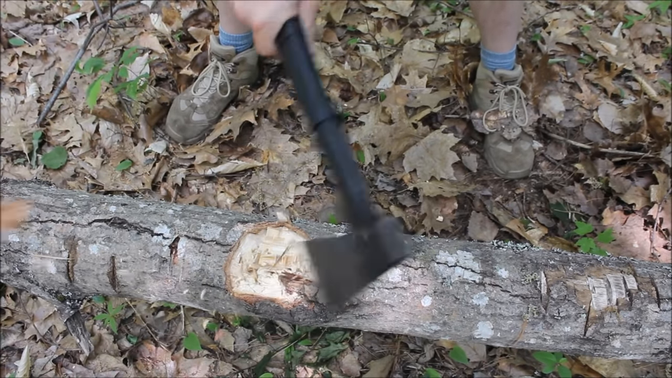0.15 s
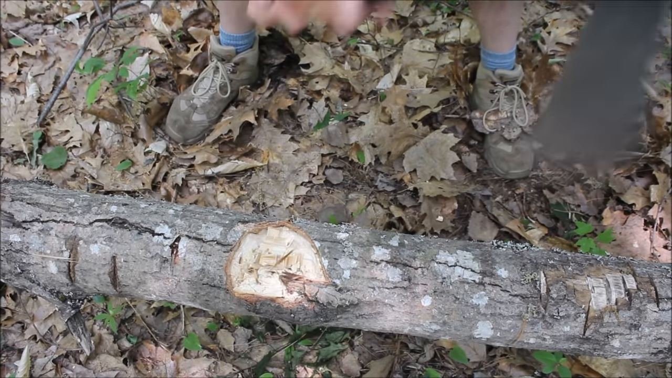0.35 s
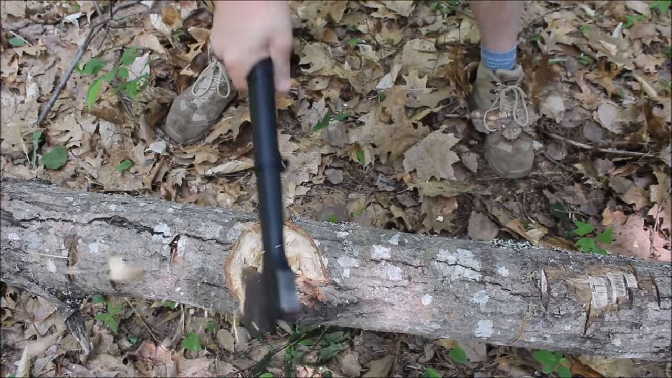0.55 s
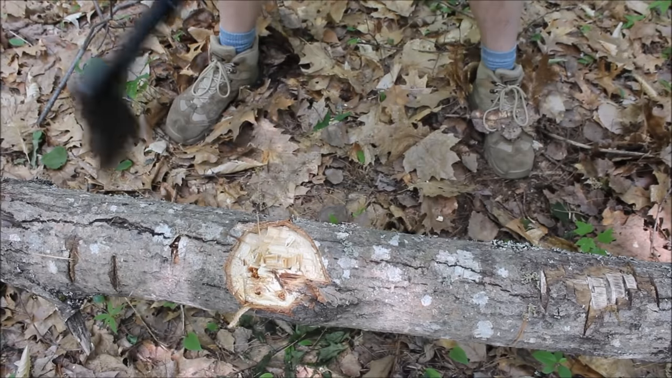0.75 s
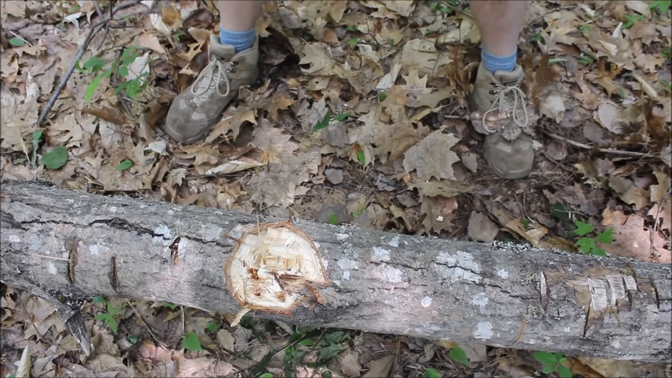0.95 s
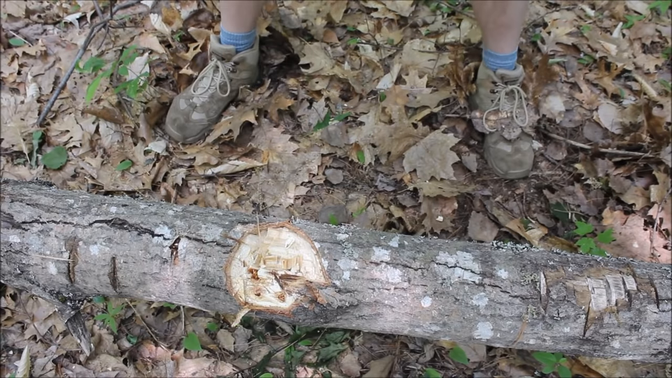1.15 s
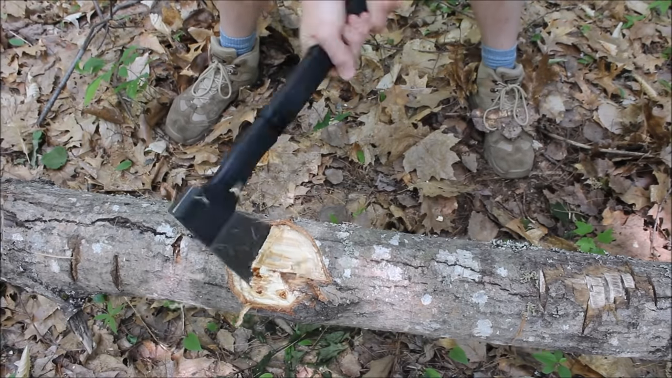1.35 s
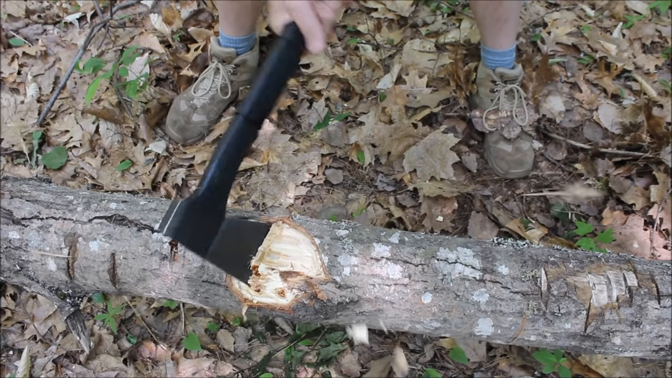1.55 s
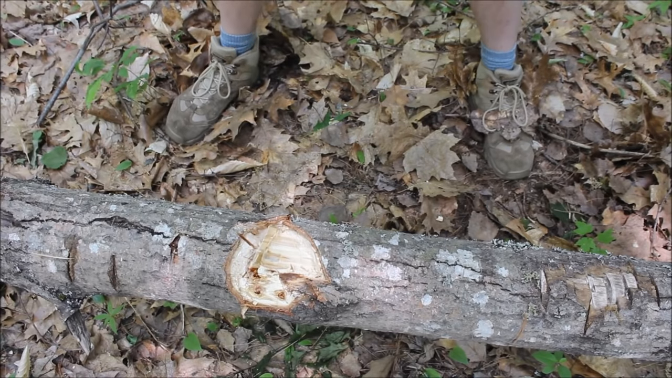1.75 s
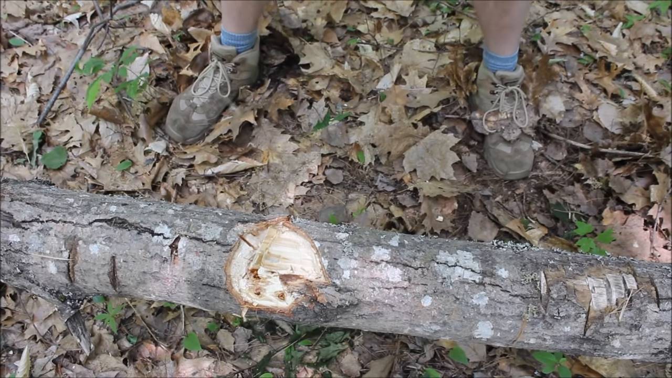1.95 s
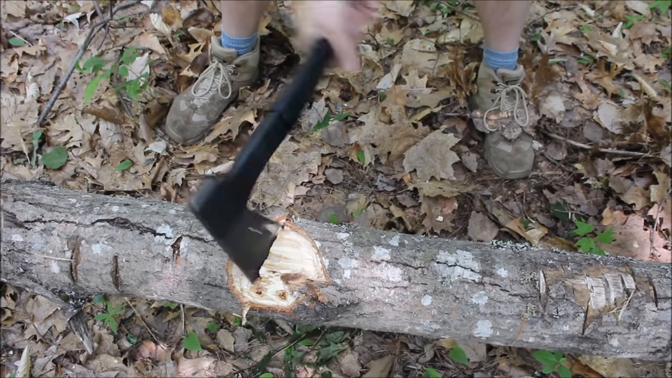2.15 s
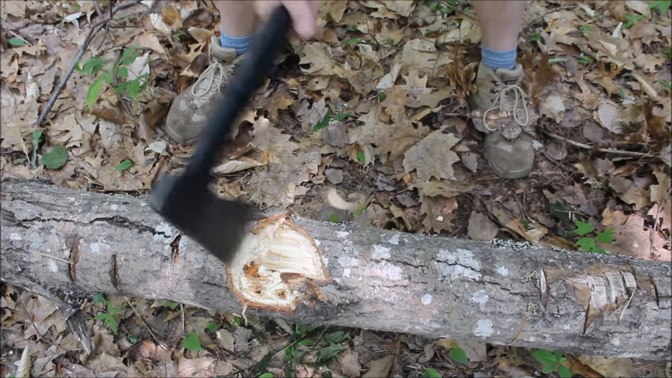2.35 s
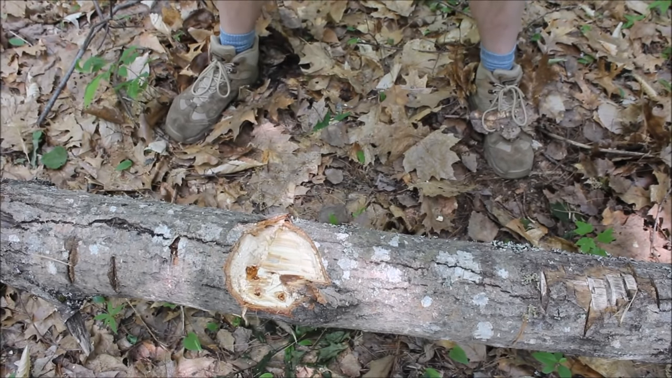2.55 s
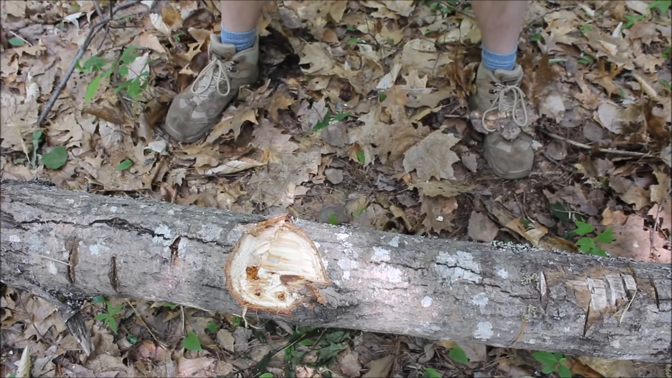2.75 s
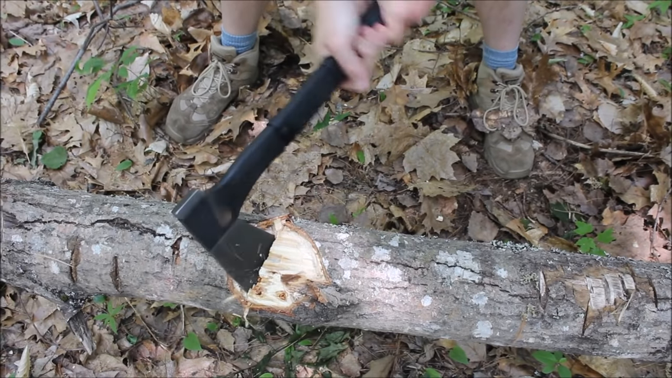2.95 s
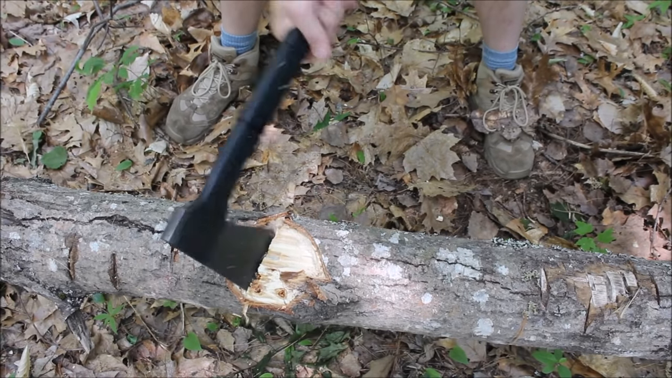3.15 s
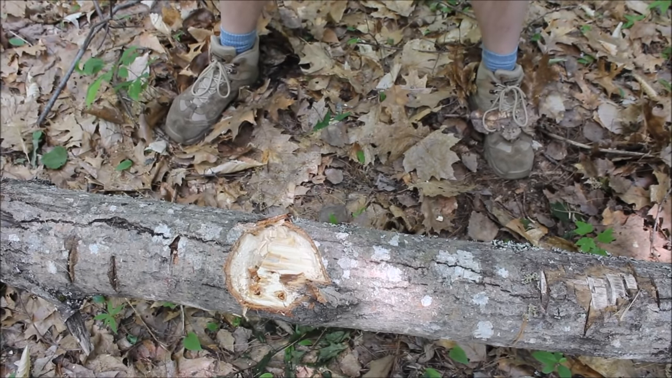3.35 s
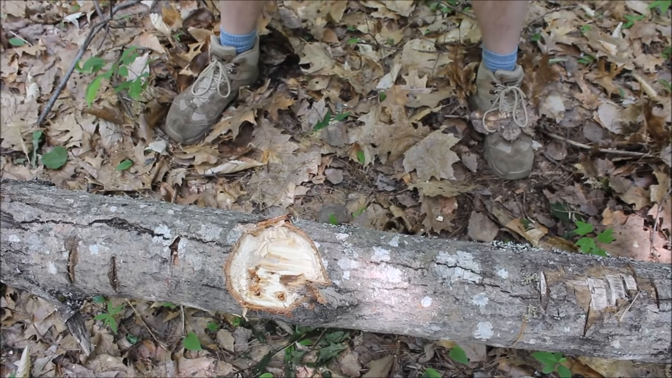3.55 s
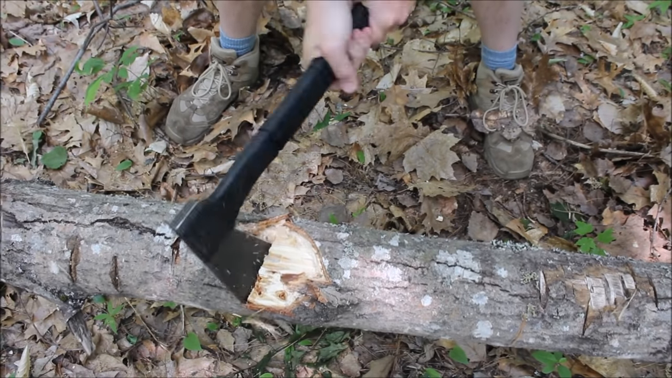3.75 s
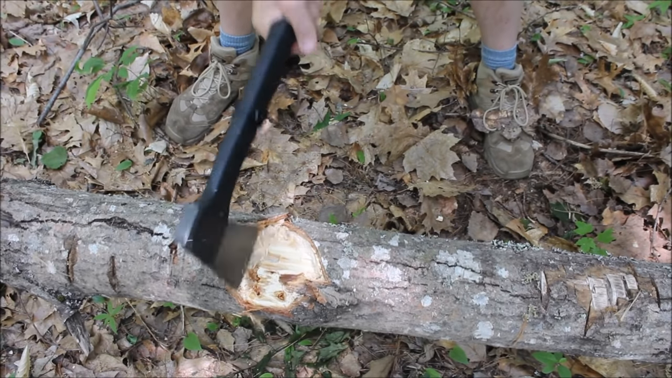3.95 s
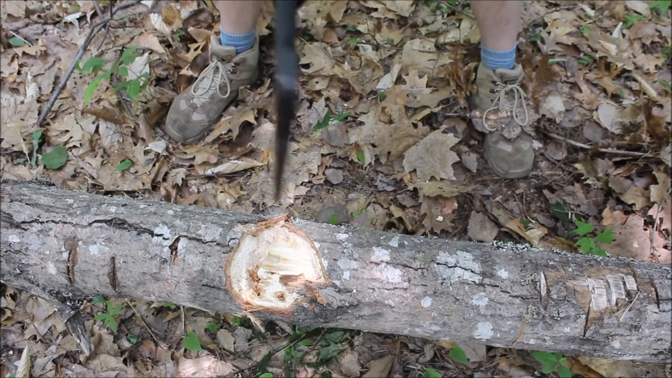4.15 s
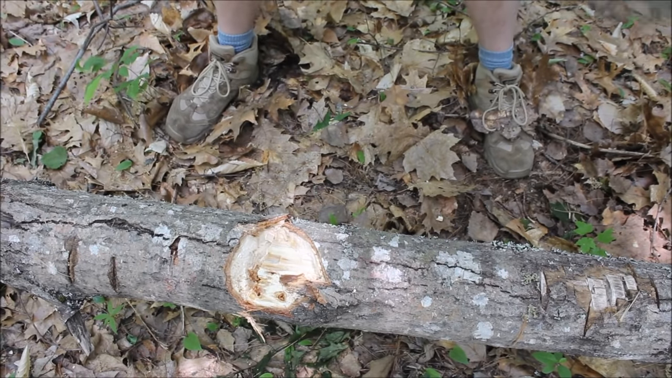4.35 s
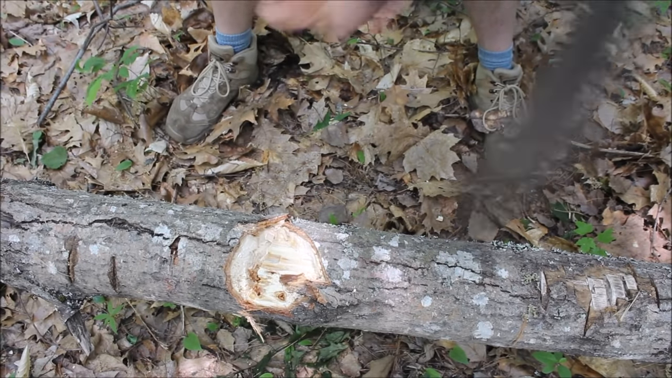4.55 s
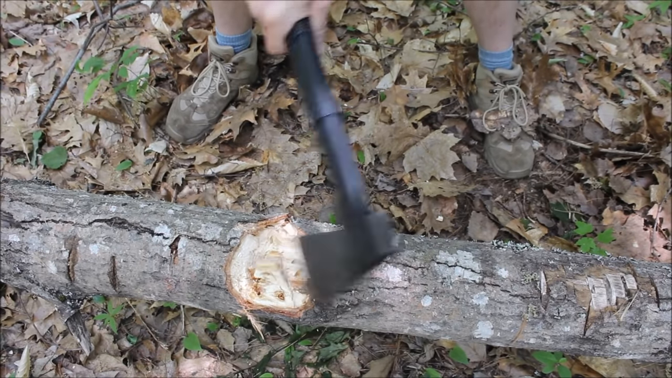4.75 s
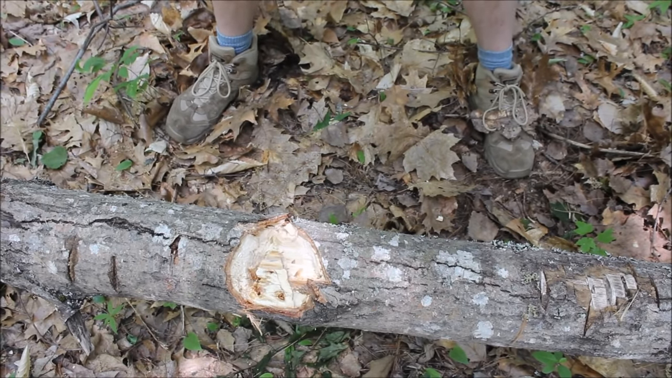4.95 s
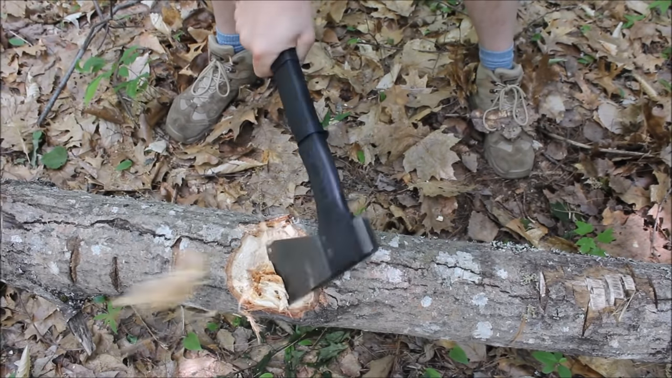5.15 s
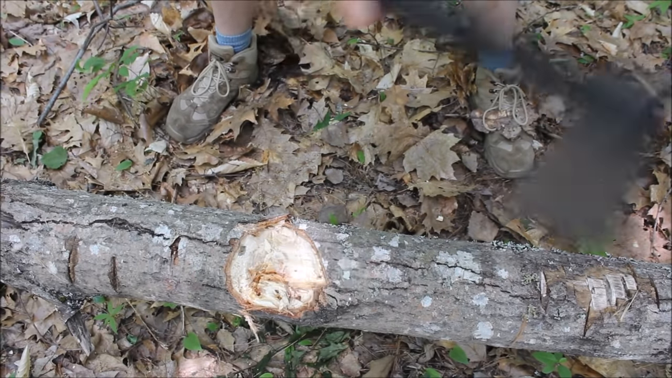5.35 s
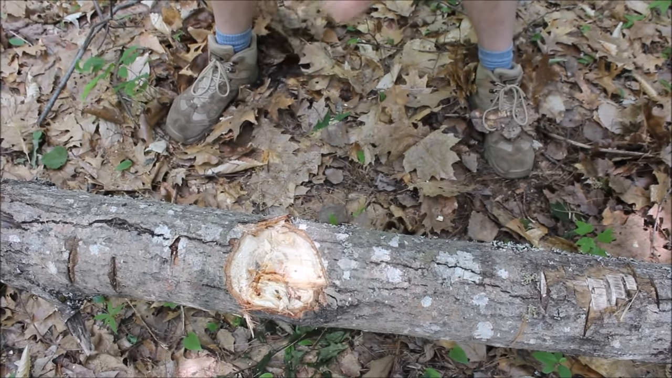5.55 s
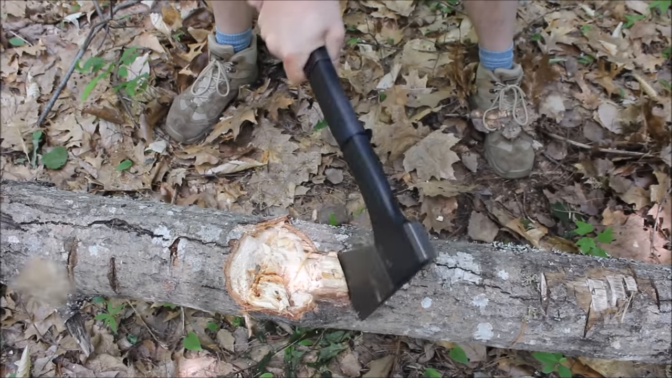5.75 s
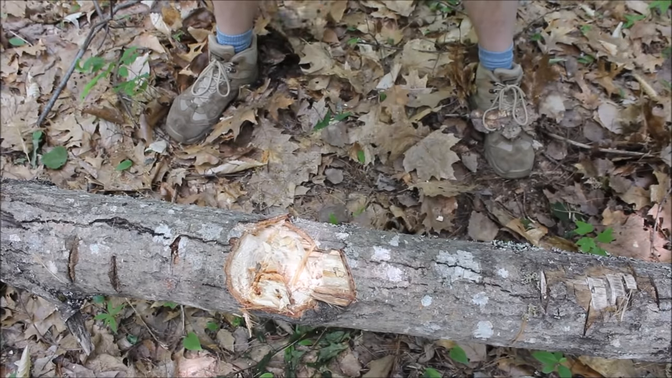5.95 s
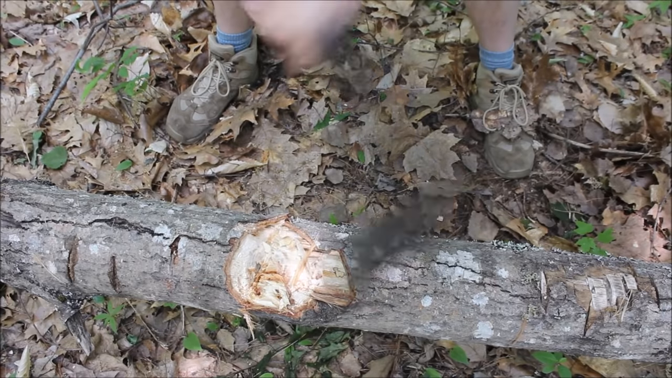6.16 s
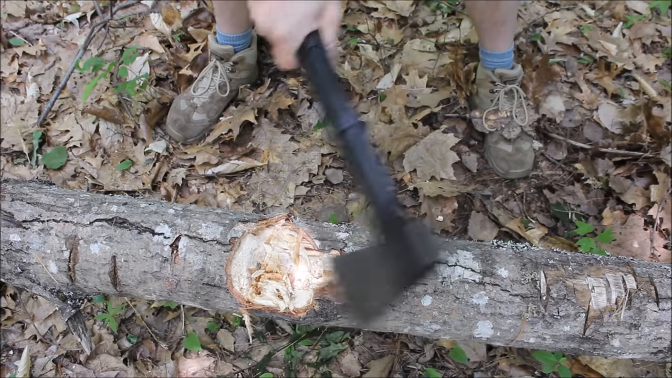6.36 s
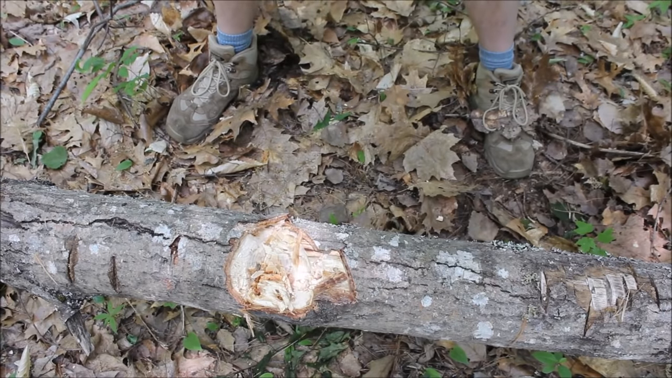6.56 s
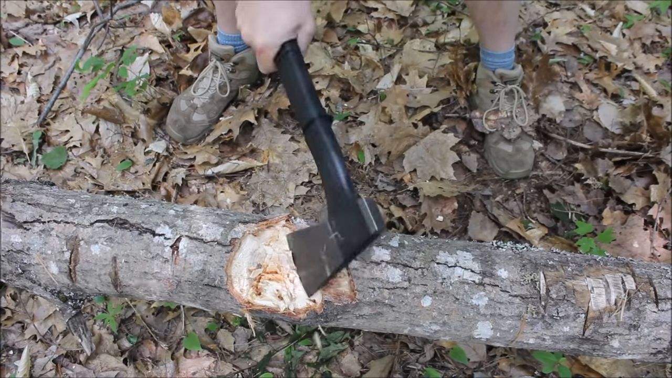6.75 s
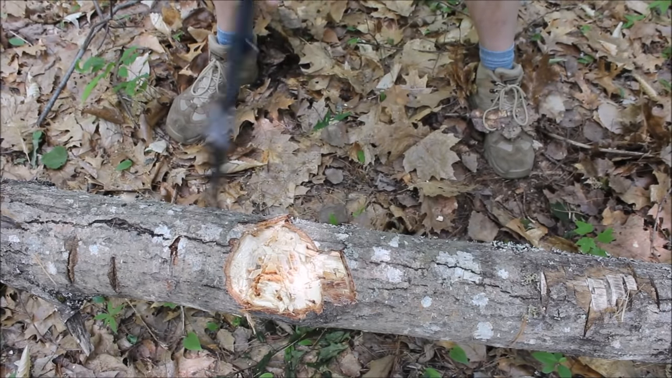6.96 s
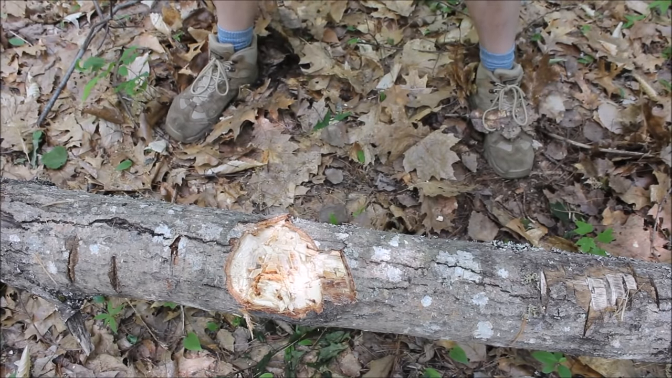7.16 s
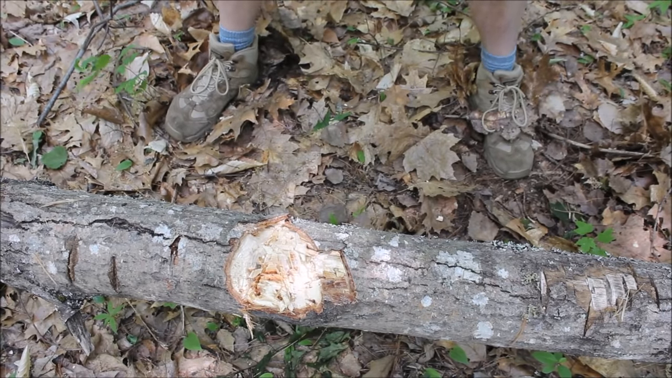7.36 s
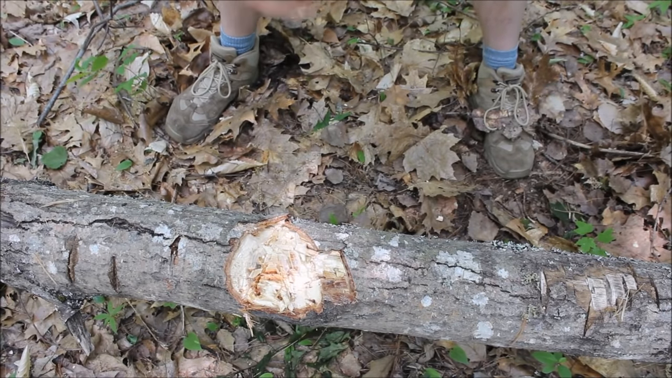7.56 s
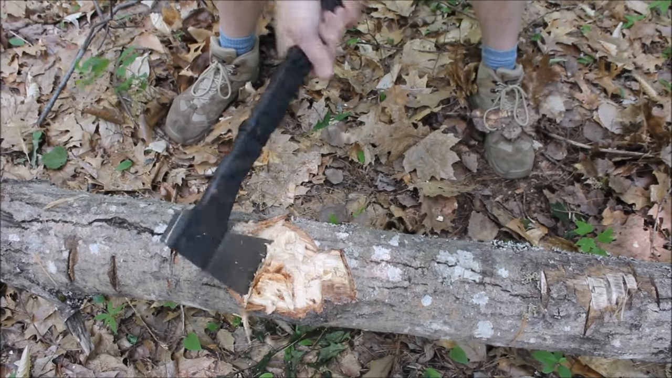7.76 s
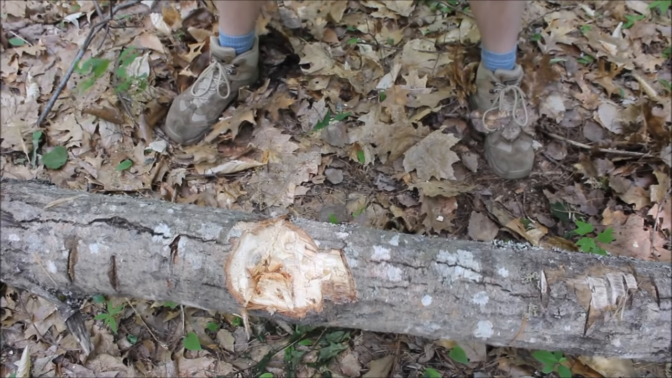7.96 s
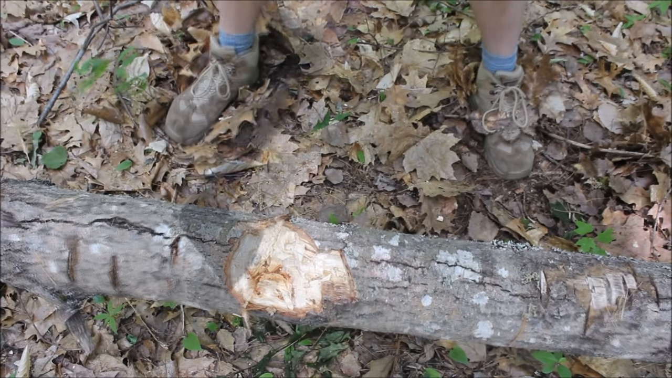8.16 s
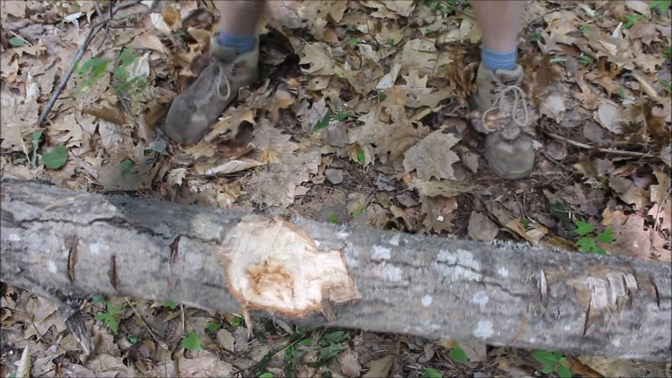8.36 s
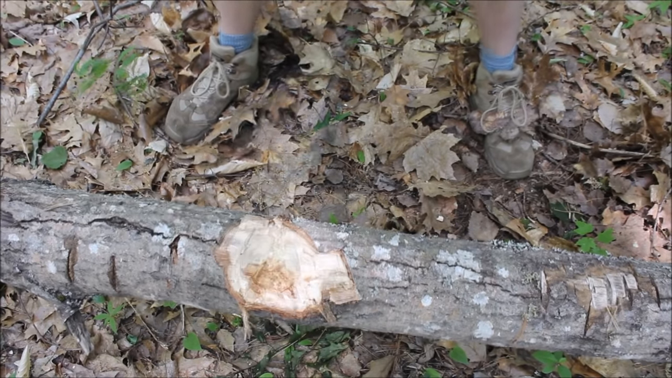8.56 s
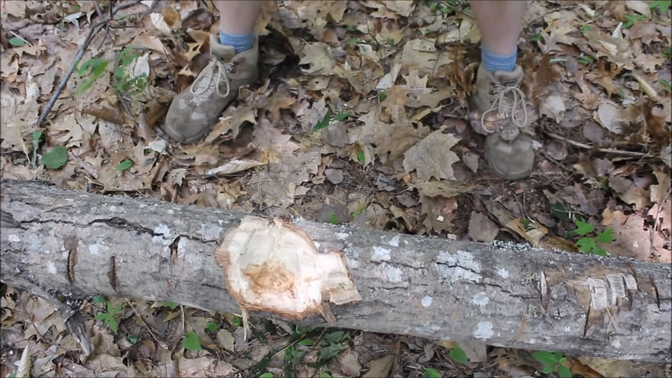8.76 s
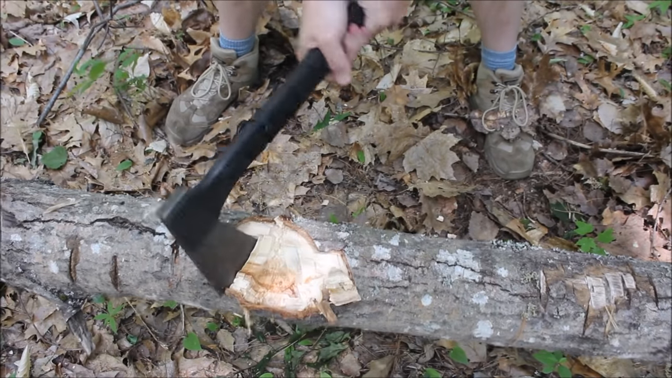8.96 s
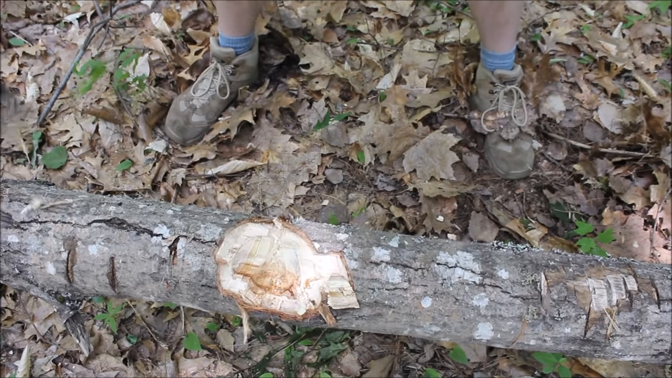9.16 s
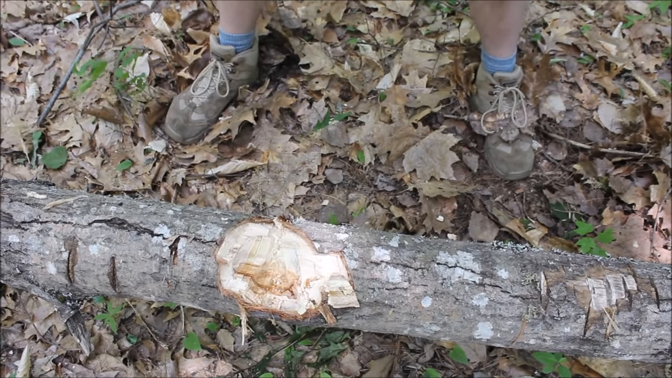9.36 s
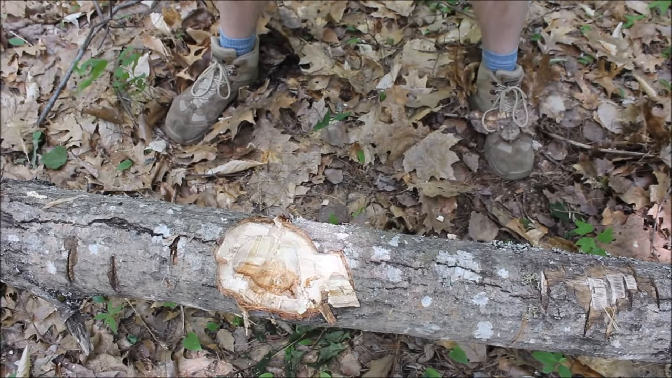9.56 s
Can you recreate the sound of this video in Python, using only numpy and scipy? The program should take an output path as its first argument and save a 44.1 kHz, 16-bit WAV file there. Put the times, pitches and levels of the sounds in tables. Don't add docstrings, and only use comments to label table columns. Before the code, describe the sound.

Close to the microphone, an axe strikes a lying log fifteen times over about ten seconds. Every hit is a sharp, clipped crack with a brief squealing bite, tearing fibres and a short woody thud. Chips snap loose and tumble through dry leaves, most clearly after the second blow. Leaves crackle between hits, over quiet woodland air, faint trunk echoes and low ground rumble.

```python
import sys
import numpy as np
from scipy import signal
from scipy.fft import rfft, irfft
from scipy.io import wavfile
from scipy.ndimage import uniform_filter1d

SR = 44100
rng = np.random.default_rng(int(sys.argv[2]) if len(sys.argv) > 2 else 0)


def voltage_ratio(level):
    return 10 ** (np.asarray(level, float) / 20)


def transcribe(signal):
    frames = np.atleast_2d(signal).T
    limited = np.clip(frames, -1, 1)
    pcm = np.round(limited * 32767).astype(np.int16)
    wavfile.write(sys.argv[1], SR, pcm)


N = 423801


def evened(x):
    return x / np.sqrt(np.mean(x ** 2) + 1e-20)


def read(points, hz):
    f, value = np.transpose(points)
    return np.interp(np.log(hz + 1), np.log(f + 1), value)


def add(mix, s, sound):
    part = mix[max(round(s * SR), 0):][:len(sound)]
    part += sound[:len(part)]


def resonate(x, hz, width):
    turn = np.exp(2j * np.pi * np.cumsum(hz * np.ones(len(x))) / SR)
    r = np.exp(-np.pi * width / SR)
    return 2 * (turn * signal.lfilter([1 - r], [1, -r], x / turn)).real


def resonate_twice(x, hz, width, second_width):
    return resonate(resonate(x, hz, width), hz, second_width)


def filtered(x, order, hz, kind="low"):
    return signal.lfilter(*signal.butter(order, hz, kind, fs=SR), x)


def colour(x, points):
    gain = voltage_ratio(read(points, np.fft.rfftfreq(len(x), 1 / SR)))
    return evened(irfft(rfft(x) * gain, len(x)))


def fade(t, t60, rise):
    return (1 - np.exp(-t / rise)) * voltage_ratio(-60 * t / max(t60, .002))


# (frequency [Hz], density [dB per Hz])
HUSH_SPECTRUM = [(18, -16), (30, -9), (71, 0), (184, -24), (437, 13), (3140, 9), (16000, -62)]


def hush():
    return voltage_ratio(-68) * colour(rng.standard_normal(N), HUSH_SPECTRUM)


# (frequency [Hz], t60 [s])
TRUNK_ECHO = [(60, 0.43), (160, 0.16), (420, 0.14), (1100, 0.18), (2900, 0.68), (7700, 0.29),
              (16000, 0.072)]


def woods(x):
    taps = np.zeros(SR)
    at = np.arange(500, SR - 20, 20)
    taps[at + rng.integers(0, 20, len(at))] = rng.choice([-1., 1.], len(at))
    hz, t, z = signal.stft(taps, SR, nperseg=256)
    dying = voltage_ratio(-60 * t / read(TRUNK_ECHO, hz)[:, None])
    tail = signal.istft(z * dying, SR, nperseg=256)[1]
    x = filtered(x, 1, 1100)
    return signal.fftconvolve(x, tail / np.linalg.norm(tail))[:N]


# (time [s], level [dB])
STIRRING = [(0.0, -46.5), (0.16, -56.5), (0.77, -56), (1.15, -44), (1.63, -56.5), (2.22, -46), (2.57, -54),
            (2.97, -46), (3.26, -55), (4.63, -48.5), (4.82, -55.5), (5.62, -61.5), (6.1, -47), (7.07, -55),
            (7.33, -46.5), (8.88, -43.5), (9.21, -51), (9.61, -44)]


def stir_db(t):
    sweep_db, rise_s, fall_s = -49, 0.18, 0.043
    power = voltage_ratio(np.interp(t, *np.transpose(STIRRING)) + 2.5) ** 2
    for row in AXE_BLOWS:
        pace_s = np.where(t < row[0], rise_s, fall_s)
        power = power + voltage_ratio(sweep_db) ** 2 * np.exp(-abs(t - row[0]) / pace_s)
    return 10 * np.log10(power)


def stir_curve_db():
    return np.repeat(stir_db(np.arange(0, N, 64) / SR), 64)[:N]


# (time [s], level [dB], pitch [Hz])
SOIL_THUMPS = [
    (.998, -44, 100),
    (1.028, -51, 90),
    (1.076, -37, 80),
    (1.11, -42, 101),
    (1.143, -42, 70),
    (1.189, -32, 113),
    (1.222, -38, 130),
    (1.292, -47, 80),
    (1.33, -50, 70),
]


def rumble():
    rest_db, stir_share = -66.5, 0.61
    blow_db, blow_t60_s, blow_rise_s = -44.5, 1.07, 0.038
    thump_shake_db, thump_t60_s, thump_rise_s = -8, 0.11, 0.005
    t = np.arange(N) / SR
    noise = rng.standard_normal((2, N))
    low = evened(resonate(resonate(noise[0], 54, 26), 60, 64))
    shake = voltage_ratio(rest_db + stir_share * (np.interp(t, *np.transpose(STIRRING)) + 51))
    for row in AXE_BLOWS:
        add(shake, row[0], voltage_ratio(blow_db + row[4]) * fade(t[:SR], blow_t60_s, blow_rise_s))
    thumps = np.zeros(N)
    short = t[:SR // 4]
    for s, db, hz in SOIL_THUMPS:
        knock = voltage_ratio(db) * fade(short, thump_t60_s, thump_rise_s)
        add(shake, s, voltage_ratio(thump_shake_db) * knock)
        grit = evened(resonate_twice(noise[1, round(s * SR):][:SR // 4], hz, 130, 170))
        add(thumps, s, knock * (np.sin(2 * np.pi * hz * short) + 0.25 * grit))
    return shake * low + thumps


def pricks():
    per_s, level_db, t60_s = 45, -4.5, 0.0036
    size = voltage_ratio(4.0 * np.minimum(rng.exponential(1, N), 4)) * (rng.random(N) < per_s / SR)
    spread = signal.oaconvolve(size, voltage_ratio(-60 * np.arange(800) / SR / t60_s))[:N]
    thin = filtered(spread * rng.standard_normal(N), 2, 3000, "high")
    return voltage_ratio(level_db + stir_curve_db()) * thin


# (frequency [Hz], density [dB per Hz])
LEAF_SPECTRUM = [(59, 5), (100, 16.5), (302, 0), (547, 0), (1010, -1), (1720, -2.5), (3050, -1.5),
                 (7140, -6.5), (16000, -20)]


def rustle():
    bright_db, brighter_per_db = -2.5, 0.06
    level_db = stir_curve_db()
    clumps = voltage_ratio(5 * evened(uniform_filter1d(rng.standard_normal(N), size=500)))
    crackles = rng.random(N) < 700 * clumps / SR
    size = voltage_ratio(2.95 * np.minimum(rng.exponential(1, N), 5)) * crackles
    spread = signal.oaconvolve(size, voltage_ratio(-60 * np.arange(400) / SR / 0.0021))[:N]
    noise = rng.standard_normal((2, N))
    leaves = colour(evened(spread * noise[0]) * 0.73 + noise[1], LEAF_SPECTRUM)
    leaves = filtered(leaves, 2, 330, "high")
    dull = filtered(leaves, 2, 3500)
    treble_gain = voltage_ratio(bright_db + brighter_per_db * (level_db + 54.5))
    return voltage_ratio(level_db) * (dull + treble_gain * (leaves - dull))


# (time [s], level [dB rms], pitch [Hz], length [s])
LEAF_SCUFFS = [(0.891, -45.5, 3500, 0.044), (0.916, -41, 3560, 0.053), (0.985, -37, 4030, 0.093),
               (1.075, -40, 1970, 0.052), (1.105, -25.5, 2950, 0.029), (1.203, -30.5, 3060, 0.042),
               (1.309, -43, 2460, 0.11), (2.962, -31.5, 2770, 0.041), (4.393, -43.5, 2510, 0.053),
               (6.036, -30.5, 3000, 0.051), (7.325, -38, 1500, 0.067), (8.634, -41, 3100, 0.11)]


def scuff(row, chance):
    s, level_db, hz, length = row
    u = np.arange(len(chance)) / SR / length
    uneven = voltage_ratio(3.2 * evened(uniform_filter1d(chance[::-1], size=90)))
    body = evened(resonate(chance, hz, 2.6 * hz)) + 0.3 * colour(chance, LEAF_SPECTRUM)
    body = filtered(body, 2, 300, "high")
    swell = np.sin(np.pi * np.minimum(u, 1) ** 0.28)
    return voltage_ratio(level_db) * evened(body * uneven) * swell


# (time [s], peak level [dB], pitch [Hz], treble [dB])
CHIP_TUMBLE = [(0.761, -22, 3330, -38), (0.78, -23.5, 3940, -16), (0.815, -34, 3330, -3),
               (0.902, -24.5, 3770, -14), (0.933, -19.5, 3500, 7), (0.956, -32, 3400, -9),
               (0.983, -19, 5300, -22), (0.998, -20.5, 5110, -17), (1.06, -28, 1400, -28),
               (1.077, -17.5, 2210, -24), (1.108, -9, 5650, -8), (1.14, -22.5, 3750, 7),
               (1.184, -24, 2290, -20), (1.205, -26, 3940, -18), (1.276, -29, 5910, -25),
               (1.291, -13.5, 4630, -3), (1.317, -24.5, 1600, -14), (1.347, -23.5, 1440, -16)]
# (time [s], peak level [dB], pitch [Hz], treble [dB])
CHIP_SNAPS = [(0.059, -26, 870, -18.5), (0.451, -33, 2990, 16), (1.838, -23.5, 2360, -12),
              (2.029, -25.5, 2240, -10), (2.124, -27, 844, -21), (2.714, -26.5, 1940, -12),
              (2.774, -27, 3000, 1), (2.857, -29, 1960, -16), (3.289, -29, 1320, -12),
              (3.726, -30.5, 1130, -15), (3.922, -33.5, 1760, -23), (4.097, -26, 4630, -6),
              (4.348, -26, 4360, 3), (4.382, -16.5, 2850, -7), (5.913, -26.5, 1940, -9),
              (6.185, -22.5, 2270, -9), (6.528, -32.5, 3190, -5), (6.709, -28.5, 765, -18),
              (7.081, -25.5, 2690, -6), (7.174, -27.5, 2680, 11), (7.216, -25, 4270, -34),
              (7.325, -22.5, 5290, 3), (7.386, -25.5, 3140, 9), (7.436, -26.5, 6100, -30),
              (7.47, -33, 5050, -34), (8.111, -23, 1890, -13), (8.161, -22.5, 4060, -11),
              (8.435, -26.5, 2040, 0), (8.643, -22, 2540, 6), (9.427, -27, 2880, -11)]
# (time [s], peak level [dB], pitch [Hz], treble [dB])
BARK_TICKS = [
    (6.233, -16, 2500, -1),
    (6.756, -37, 4900, -7),
    (7.65, -20.5, 1500, -11),
    (7.6617, -25, 3500, -18),
    (8.214, -22.5, 3320, -14),
    (8.969, -25.5, 1500, -11),
]
# (time [s], peak level [dB], pitch [Hz])
MORE_SNAPS = [(0.307, -32, 3400), (0.394, -30.5, 5470), (0.589, -34, 2050), (0.657, -37, 1600),
              (1.658, -30, 2050), (2.064, -27.5, 1490), (2.507, -29.5, 4100), (2.882, -26.5, 4180),
              (3.554, -29.5, 5940), (5.059, -28, 3150), (5.119, -29.5, 3760), (5.608, -29.5, 1410),
              (5.625, -30, 1920), (5.666, -30.5, 2380), (6.006, -23.5, 5000), (6.472, -36.5, 2500),
              (6.652, -29.5, 2650), (6.978, -35.5, 2100), (7.145, -32.5, 2270), (7.506, -30, 5250),
              (7.545, -35.5, 2200), (7.576, -29, 5000), (7.75, -29, 1350), (7.96, -31, 1110),
              (8.027, -28, 813), (8.094, -24, 1940), (8.339, -45, 1330), (8.596, -26, 3450),
              (8.904, -28.5, 2960), (9.528, -27.5, 5340)]


def snap(row, chance):
    s, peak_db, hz, treble_db = row
    t = np.arange(len(chance)) / SR
    t60 = 0.032 * voltage_ratio(7 * chance[-1])
    thin = filtered(colour(chance, LEAF_SPECTRUM), 1, 1500, "high")
    body = evened(resonate_twice(chance, hz, .35 * hz, 1.3 * hz))
    burst = (body + voltage_ratio(treble_db + 20) * thin) * fade(t, t60, 0.000075)
    return voltage_ratio(peak_db - 1.5) * burst / abs(burst).max()


# (frequency [Hz], level [dB])
TEARING_WOOD = [(60, -51), (200, -13), (500, 2), (1000, -3.5), (2500, 6), (5000, 0), (9000, -8.5),
                (16000, -15)]
# (frequency [Hz], level [dB], t60 [s])
LOG_MODES = [(145, -15, .12), (186.7, 1.5, 0.094), (243, 5, 0.056), (300, 2.5, 0.061), (365, 1.5, 0.069),
             (408, -5.5, 0.14), (528, 2, 0.047), (604, 2.5, 0.11), (789, -8, 0.1), (954, -3, 0.052),
             (1245, -3, 0.091)]
# (time [s], sinking time [s], bite pitch at entry [Hz], pitch at depth [factor], log thud [dB])
AXE_BLOWS = [(0.1075, 0.0056, 2830, 0.45, -21.5), (0.4894, 0.011, 2570, 1.6, -26),
             (1.3913, 0.0079, 2030, 0.64, -18), (2.217, 0.0058, 3240, 0.41, -16),
             (3.0113, 0.0083, 1965, 0.52, -15.5), (3.7694, 0.0064, 1953, 0.54, -14.5),
             (4.6684, 0.0047, 2180, 0.79, -24.5), (5.2012, 0.0074, 1850, 1.5, -32),
             (5.7086, 0.0018, 2490, 0.75, -20.5), (6.2507, 0.0014, 2200, 1.035, -21),
             (6.7697, 0.0051, 2460, 0.795, -21.5), (7.669, 0.0044, 1720, 0.91, -13),
             (8.2326, 0.0043, 2550, 0.83, -18.5), (8.4753, 0.0035, 1435, 0.95, -15.5),
             (8.9845, 0.0035, 3520, 0.93, -16)]
# (chip level [dB], chip pitch [Hz], fibre tearing [dB],
# log brightness [dB per octave], swing strength [dB])
FREED_CHIPS = [(-4.5, 1970, -1, 1.5, -3.5), (-10, 2900, 4.5, 4, -15), (-1, 3540, -4, -9, -3),
               (-12.5, 1900, -4, 0.5, 1.5), (1, 970, -1.5, 1.5, -4), (-1.5, 620, -6.5, -0.5, 2.5),
               (-12, 2470, 1, -0.5, 1.5), (-9.5, 1580, -0.5, -6, -5), (-14.5, 880, -3.5, 0.5, -4),
               (-4, 3360, -3, -0.5, 0.5), (-9, 2900, 3.5, -4, -5), (6, 1050, -4, 3, -0.5),
               (-14, 1520, 4, -6.5, -2.5), (0, 2100, -35, -11, 3), (12, 2400, 5, -5.5, -2)]


def blow(row, chip, chance):
    s, contact, bite_hz, sink, thud_db = row
    chip_db, chip_hz, tear_db, bright_db, swing_db = chip
    t = np.arange(16384) / SR
    sinking = fade(t, 0.056, 0.00075) * voltage_ratio(-60 * np.maximum(t - contact, 0) / 0.011)
    glide_hz = bite_hz * (1 + (sink - 1) * np.minimum(t / contact, 1))
    bite = evened(resonate_twice(chance[0], glide_hz, 600, 1180))
    tear = colour(chance[1], TEARING_WOOD)
    slips = voltage_ratio(5.4 * evened(uniform_filter1d(chance[3][::-1], size=60)))
    cut = slips * sinking * (bite + voltage_ratio(tear_db) * tear)

    loose = 0.56 * evened(resonate(chance[3], chip_hz, 0.47 * chip_hz)) + 0.7 * tear * voltage_ratio(-60 * t / 0.016)
    chip_t60 = .028 * voltage_ratio(-0.46 * chip_db)
    loose = loose * fade(t, chip_t60, 0.00029)

    push = chance[2] * fade(t, 0.031, 0.0022)
    push = push + 0.32 * np.roll(push, round(0.014 * SR))
    ring = np.zeros(len(t))
    for hz, db, ring_s in LOG_MODES:
        mode_db = db + bright_db * max(np.log2(hz / 400), -.3)
        ring += voltage_ratio(mode_db) * evened(resonate(push, hz, 2.87 / ring_s))
    soil_hz = 100 + 560 * np.exp(-t / 0.036)
    soil = evened(resonate_twice(chance[2][::-1], soil_hz, 320, 390)) * fade(t, 0.22, 0.027)
    thud = ring / abs(ring).max() + voltage_ratio(-19) * soil
    return voltage_ratio(swing_db + 3.5) * cut + voltage_ratio(chip_db + 4.5) * loose + voltage_ratio(thud_db + 11.0) * thud


def scene():
    near = np.zeros(N)
    for row, chip, chance in zip(AXE_BLOWS, FREED_CHIPS, rng.standard_normal((len(AXE_BLOWS), 4, 16384))):
        add(near, row[0], blow(row, chip, chance))
    cracks = [(*row, -12.5) for row in MORE_SNAPS]
    small = [*CHIP_TUMBLE, *CHIP_SNAPS, *BARK_TICKS, *cracks]
    for row, chance in zip(small, rng.standard_normal((len(small), 4096))):
        add(near, row[0], snap(row, chance))
    for row, chance in zip(LEAF_SCUFFS, rng.standard_normal((len(LEAF_SCUFFS), 4096))):
        add(near, row[0], scuff(row, chance))
    echo = voltage_ratio(-30) * woods(np.tanh(near))
    return (near + echo + rustle() + rumble() + pricks() + hush())[None]


# (time [s], kept lines [share])
THIN_MOMENTS = [(.154, 0.46), (.41, 0.35), (.854, 0.56), (1.027, 0.29), (1.217, 0.14), (2.312, 0.17),
                (2.347, 0.17), (2.391, 0.2), (2.436, 0.12), (2.497, 0.2), (3.649, 0.3), (3.927, 0.24),
                (4.205, 0.17), (4.642, 0.95), (4.694, 0.19), (4.737, 0.33), (5.629, 0.27), (5.68, 0.52),
                (5.762, 0.41), (5.806, 0.32), (5.846, 0.27), (6.018, 0.2), (6.189, 0.27), (6.425, 0.084),
                (7.064, 0.72), (7.277, 0.67), (8.046, 0.63), (8.09, 0.44), (.325, 0.2), (9.189, 0.24)]


def thin_out(x):
    x = x.copy()
    bell = signal.windows.tukey(1792, .6)
    tilt = (np.fft.rfftfreq(1792, 1 / SR) + 300) ** .3
    for s, share in THIN_MOMENTS:
        part = x[round(s * SR) - 896:][:1792]
        lines = rfft(part * bell)
        strength = abs(lines) * tilt
        weak = strength < np.quantile(strength[:650], np.clip(1 - .9 * share, 0, 1))
        weak[:9] = False
        part -= irfft(lines * weak) * signal.windows.tukey(1792, .7)
    return x


def band_limit(x):
    return signal.sosfilt(signal.butter(12, 16990, fs=SR, output="sos"), x)


def record(dry):
    clipped = np.clip(dry[0], -0.49, 0.49)
    limited = signal.oaconvolve(clipped, signal.firwin(255, 15900, fs=SR), "same")
    mix = thin_out(limited)[None]
    return band_limit(mix)


dry = scene()
out = record(dry)
transcribe(out)
```